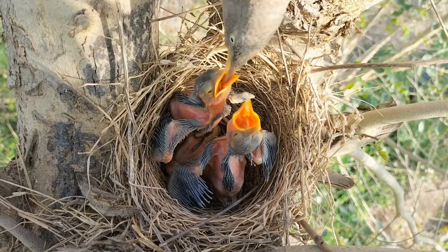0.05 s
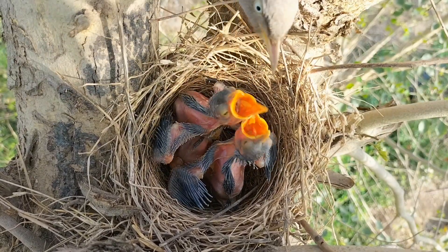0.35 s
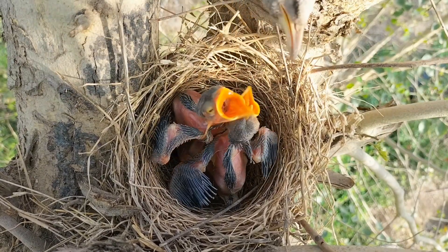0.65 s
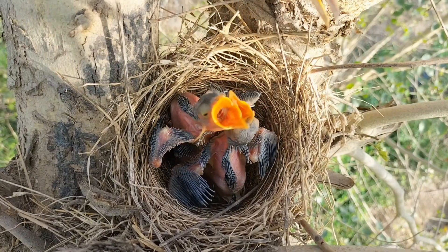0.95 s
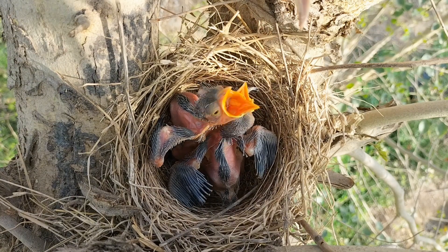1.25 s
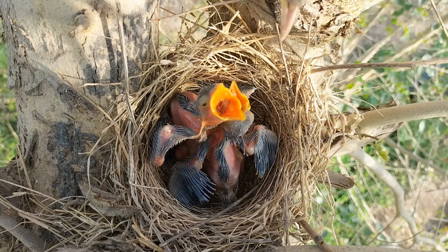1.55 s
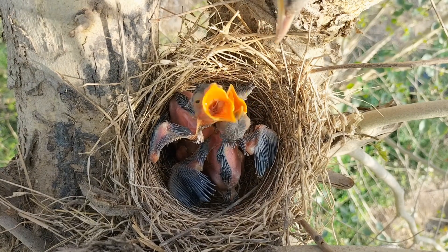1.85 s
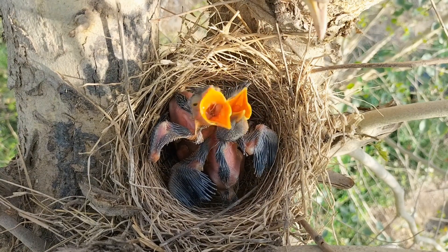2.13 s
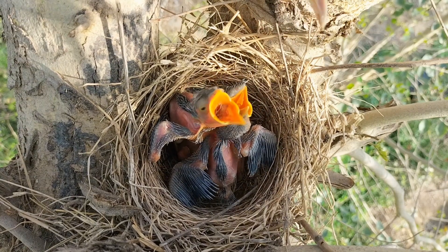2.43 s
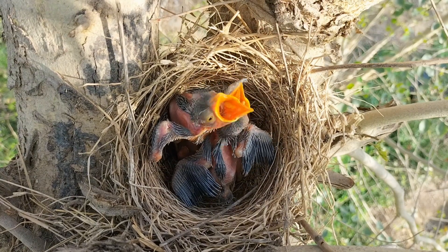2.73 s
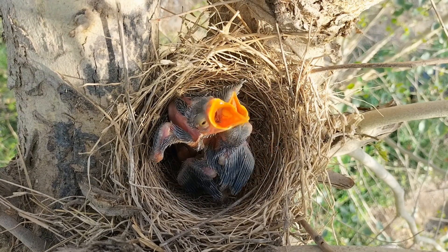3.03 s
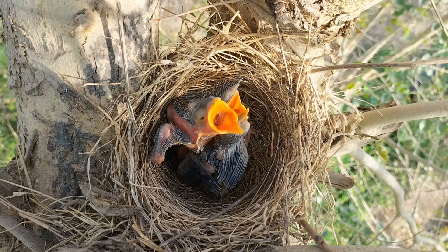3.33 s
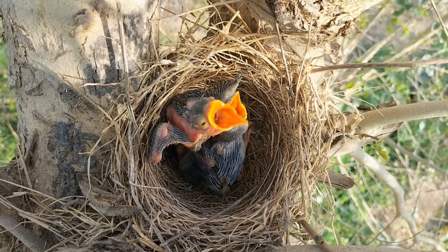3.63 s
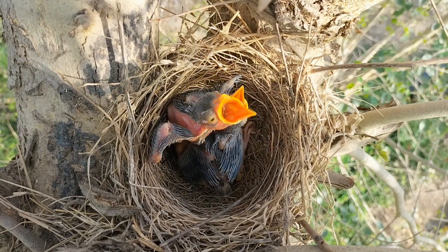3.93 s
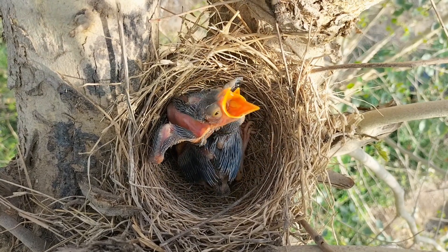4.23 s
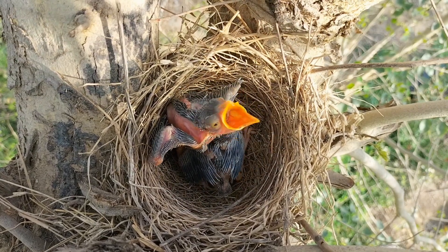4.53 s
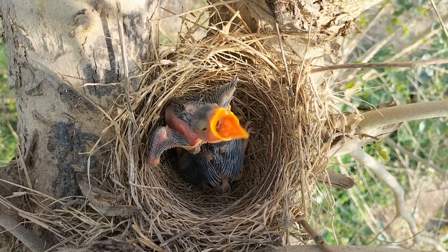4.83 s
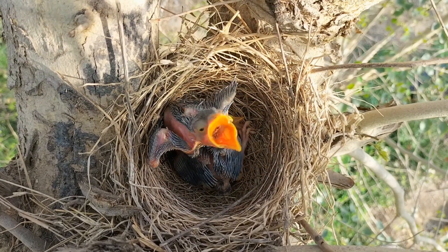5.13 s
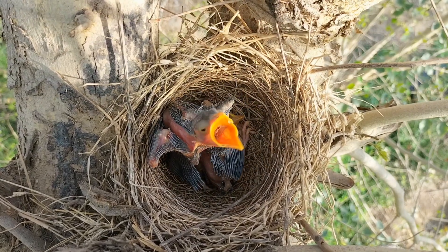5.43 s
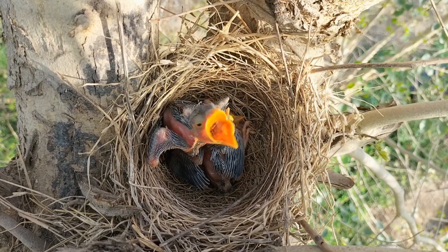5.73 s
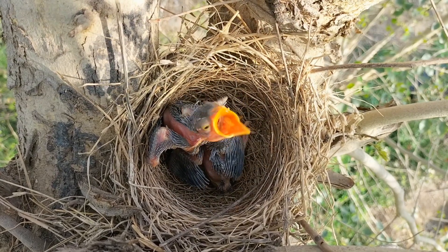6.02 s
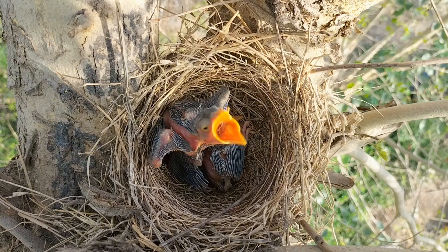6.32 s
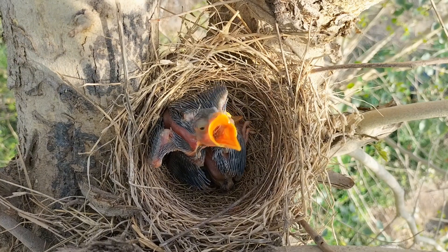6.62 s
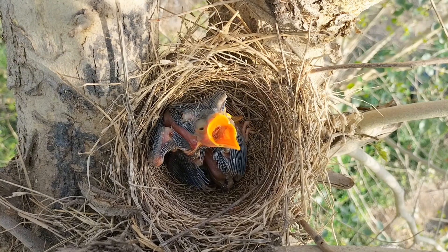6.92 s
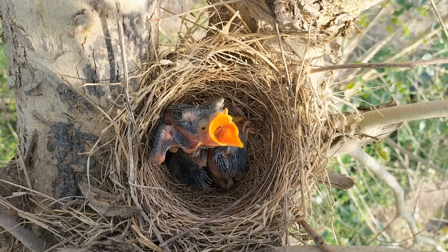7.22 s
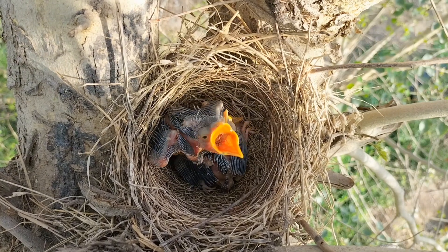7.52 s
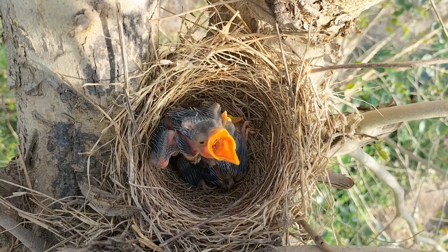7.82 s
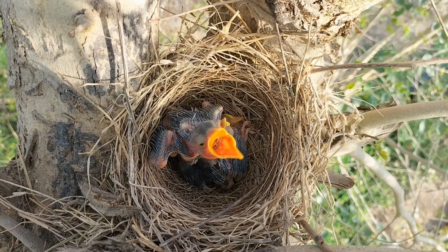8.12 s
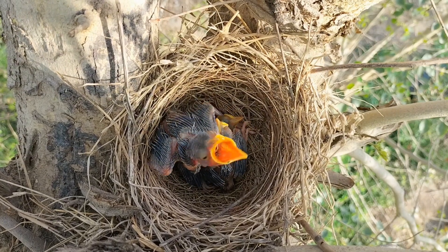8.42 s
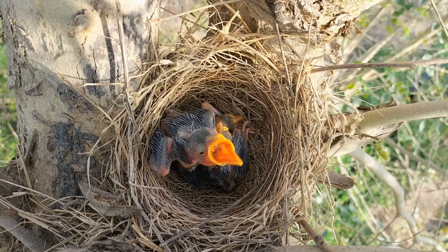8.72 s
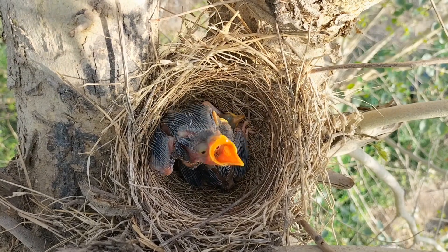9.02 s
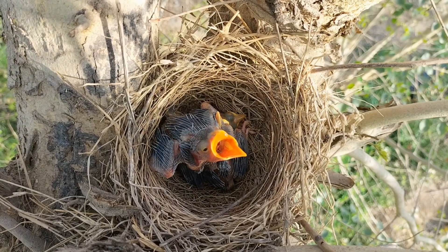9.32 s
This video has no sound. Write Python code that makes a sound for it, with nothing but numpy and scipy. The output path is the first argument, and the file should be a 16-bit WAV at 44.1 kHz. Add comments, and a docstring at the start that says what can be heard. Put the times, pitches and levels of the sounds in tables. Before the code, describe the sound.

An adult bird gives one harsh note, and nestlings start begging close to the microphone. About once a second a shrill call opens as a whistle, breaks into a rasp and fades in a crackle. Between and over these calls, adult birds chatter in quick, rough runs, with a few thin peeps. From about halfway, dry nest straw ticks lightly. A low outdoor rumble and soft hiss lie underneath.

```python
"""Over a low outdoor rumble an adult babbler gives one harsh note, and nestlings begin to beg close by.
Each of their nine calls opens as a whistle of two coupled syrinx voices, breaks into a rasp as they sag,
and ends in a crackle as the air runs out. Between and over the calls come thin peeps and the chatter of
adult birds, one low and barking, one thinner, sometimes overlapping: resonant pulse trains in runs of
about twelve notes a second. From about halfway, dry nest straw ticks. One mono microphone hears it."""
import sys
import numpy as np
from scipy import signal
from scipy.fft import rfft, irfft, next_fast_len
from scipy.io import wavfile
from scipy.ndimage import uniform_filter1d, minimum_filter1d, map_coordinates

SR = 44100
rng = np.random.default_rng(int(sys.argv[2]) if len(sys.argv) > 2 else 0)


def to_wav(sig):
    """Store sig (one row per channel, or 1-D mono) as 16-bit WAV at the path in sys.argv[1].

    Samples outside -1..1 are clipped; the rate is SR.
    """
    pcm = np.clip(np.atleast_2d(sig), -1, 1) * 32767
    pcm = np.round(pcm).astype(np.int16)
    wavfile.write(sys.argv[1], SR, pcm.T)  # frames by channels


N = 412776

# begging calls: start t/s, end t/s, attack t/s, time until the fade t/s, level/dB, fade/dB,
# shrill resonance f/Hz, upper voice opening f/Hz, lower voice opening f/Hz, sag t/s
BEGGING_CALLS = [(.128, 0.599, .17, 0.25, -17.8, 11.5, 6120, 3290, 2198, 0.056),
                 (1.026, 1.711, .13, 0.29, -19, 14, 6140, 2402, 2432, 0.16),
                 (2.436, 2.924, 0.063, 0.25, -16.5, 22.5, 5990, 2550, 2005, .025),
                 (3.805, 4.411, 0.096, .29, -17.5, 11, 6040, 3700, 2520, 0.079),
                 (4.782, 5.311, 0.091, 0.21, -21, 11, 5980, 2416, 2501, 0.12),
                 (5.829, 6.307, 0.12, 0.2, -14.5, 11, 5790, 3370, 2320, .042),
                 (6.728, 7.426, 0.066, .26, -24.5, 3.5, 5920, 2592, 2600, .11),
                 (7.83, 8.371, .18, .22, -15, 17, 5630, 3310, 2299, 0.068),
                 (8.729, 9.362, .085, 0.18, -23, 14, 5870, 2583, 2654, 0.099)]
# a nestling strains: t/s, rise t/s, fall t/s, upper voice lift f/Hz, lower voice lift f/Hz,
# clearing of the rasp (0-1), gain/dB
STRAINS = [(.3, .03, 0.039, 378, 99.5, 0, 4), (.395, .022, 0.088, 620, 1050.5, 0.9, 2),
           (1.128, .042, 0.087, 878.7, 100, 0.32, -0.8), (2.67, 0.023, .04, 80.4, 260, 0.08, -1),
           (3.89, .012, .022, 250.8, 1, 0.65, -2.5), (4.024, .026, .052, 610, 439.5, 0.57, 0.8),
           (4.856, .012, 0.046, 579.4, 0, 0.26, -1.5), (6.115, 0.038, .078, 189.4, 760, .85, 0.9),
           (6.845, .022, .04, 379.6, 0.5, .1, -2), (8.135, .035, 0.044, 439, 500.5, .25, 1.5),
           (8.83, 0.021, 0.039, 640, 1, .45, -0.5)]
# catches of the voice as a call runs out: t/s, boost/dB
CATCHES = [(1.546, 4), (1.623, 6), (2.83, 6), (2.854, 4.5), (2.908, 6), (5.235, 4.5), (9.099, 4.5),
           (9.178, 6), (9.194, 7), (9.271, 8)]
# tone colour of the begging calls as heard, with a deep dip near 9 kHz: f/Hz, level/dB
BEG_COLOUR = [(650, -12.5), (950, -6.5), (1400, -8), (2020, -9.5), (2600, -4.5), (3150, -4.5),
              (3650, -12.5), (4080, -9.5), (4550, -16), (5400, -3.5), (6050, 3), (6700, -5.5),
              (8200, -22.5), (9300, -74.5), (11800, -38), (15000, -54)]
# their throat, mouth and shrill bands: level/dB re the call, swell through the attack/dB
BEG_BANDS = [(-8.5, 19), (-4.5, 11.5), (0, 24)]
# borders between those bands: f/Hz
BEG_SPLITS = [2100, 4600]
# thin peeps: start t/s, length t/s, f/Hz, level/dB of half the peak amplitude
PEEPS = [(.952, .05, 8250, -51), (2.415, .03, 2780, -38), (4.59, .03, 3100, -43), (4.6, .05, 4100, -49),
         (4.66, .05, 4000, -50), (4.703, .035, 8000, -47), (5.37, .05, 3900, -48), (5.565, .035, 3200, -43),
         (5.64, .045, 3380, -43), (5.655, .06, 5900, -39)]
# runs of the adults' notes: first note t/s, last note t/s, base length t/s, pitch f/Hz, first pitch f/Hz,
# first accent/dB, fade per note/dB, roughness (0-1), relative level/dB of chest, throat, mouth, shrill
CHATTER_RUNS = [(.087, .087, 0.048, 703, 701, 0.5, 0, .45, -34.5, -32, -26, -31),
                (.61, .61, 0.037, 494, 495, -1, 0, .8, -38.5, -39.5, -40, -33),
                (.731, .921, 0.036, 368, 523.4, 6, 0, .45, -19, -23, -32.5, -28.5),
                (1.944, 2.371, 0.041, 454.7, 690, 8, 0.25, .72, -41.5, -40, -44.5, -35.5),
                (3.025, 3.025, 0.079, 559, 561.6, 0, 0, .58, -31, -29, -22.5, -27.5),
                (3.13, 3.412, .078, 590, 629, -1, 0.91, 0.686, -35.5, -27.7, -23, -28.5),
                (3.193, 3.279, 0.046, 582, 590, -1.5, 2, .7, -40, -35, -29, -28),
                (3.504, 3.771, 0.039, 630, 540, 3, 0, .75, -40, -40, -35.5, -37),
                (3.537, 3.803, .041, 380, 534, 1, 1.3, .45, -14, -13, -18.3, -21.5),
                (4.575, 4.69, 0.053, 604, 604, 0.5, 0, .9, -60, -44.5, -43.5, -50),
                (5.511, 5.853, 0.039, 394.2, 563, 0.5, 1.5, .52, -20.5, -20.5, -23.5, -22),
                (6.283, 6.541, .04, 535, 672, 3, 2, .5, -34.5, -27, -21, -26.5),
                (6.63, 6.63, .092, 604, 603.4, 0, 0, .6, -32.5, -26, -19, -24),
                (6.767, 6.867, .052, 544, 542, -2.5, 0, .9, -31.5, -31, -23.5, -41),
                (6.982, 7.328, 0.042, 419.8, 500.5, -1.5, 1.5, .7, -20.5, -17.5, -20.5, -23.5),
                (7.425, 7.683, 0.047, 415.6, 430, 4.5, 0, .66, -50.5, -42, -45, -46),
                (7.838, 7.838, 0.054, 759, 745, 0, 0, .54, -49, -32, -23.8, -30),
                (8.2, 8.287, 0.05, 479, 489, 1, 0, .67, -32, -29, -34.5, -46),
                (8.383, 8.657, 0.057, 471, 480, -0.5, 1.6, 0.72, -42.5, -35, -35.5, -40.5)]
# weight of accent and fade in those four bands: factor
BAND_EFFORT = [1, 1.1, 1.27, 0.79]
# borders between those bands: f/Hz
CHATTER_SPLITS = [1400, 2600, 4900]
# tone colour of the chatter as heard, with a deep dip near 9.5 kHz: f/Hz, level/dB
CHATTER_COLOUR = [(600, 7), (1700, -2), (2700, -5), (4000, -2.5), (4900, -8), (6100, -8), (7100, -7),
                  (8100, -15.5), (9500, -61), (12000, -48), (15000, -56.5)]
# resonance peaks colouring the chatter, changing between runs: from t/s, peaks f/Hz
CHATTER_PEAKS = [(0, [750, 1250, 1700, 2450, 3250, 4100, 5250, 6150]),
                 (1.8, [1136, 1480, 2400, 3580, 4130, 4600, 6030, 6380]),
                 (2.9, [1030, 1390, 2090, 2780, 3640, 4170, 5060, 5960]),
                 (3.52, [650, 1000, 1700, 2300, 3100, 4200, 5950, 7100]),
                 (4.3, [700, 1000, 1550, 2000, 2450, 2850, 4000, 5900, 6700]),
                 (6.1, [1083, 1430, 2254, 3685, 4140, 4780, 5960, 6700]),
                 (6.93, [996, 1613, 2010, 2750, 3300, 4150, 5880, 6630])]
# straw ticks: t/s, level/dB before filtering
STRAW_TICKS = [(4.546, -36), (5.644, -21.5), (5.826, -32), (7.804, -26), (7.819, -35), (8.445, -27.5)]
# spectrum of the outdoor air: f/Hz, relative level/dB
AIR_SPECTRUM = [(25, -16), (70, -4), (240, 0), (450, -7), (800, -13), (1600, -14), (3800, -18), (4700, -23),
                (6500, -22), (7800, -38), (9000, -66), (15000, -72)]
# swell of the rumble: t/s, relative level/dB
RUMBLE_SWELL = [(0, -41.5), (.6, -39.5), (1.1, -36), (1.6, -43.5), (2.1, -46.5), (2.6, -38), (3.4, -42),
                (4.6, -40), (5.2, -41.5), (6.3, -35.5), (7, -44), (8.2, -42.5), (9.36, -39)]
# far drone: centre f/Hz, width f/Hz, level/dB
DRONE_BANDS = [(192.2, 15, -47.5), (229.7, 11, -50.5)]


def begging_call(start, end, attack_s, hold_s, level_db, fade_db, shrill_hz,
                 upper_open_hz, lower_open_hz, sag_s, flutter_hz=330, waver=.0059, catch_s=.0069):
    """Nonlinear coupling: the two sides of the syrinx modulate each other and, pushed hard, rasp."""
    t = np.arange(start, end, 1 / SR)
    n, age = len(t), t - start
    upper_hz, lower_hz, rough, strain_db = syrinx(t, upper_open_hz, lower_open_hz, sag_s)
    # an uneven flutter shakes both pitch and loudness
    flutter = np.sin(cycles(flutter_hz * np.exp(.25 * wobble(n, 250))))
    swing = .06 * rough ** .7
    upper = cycles(upper_hz * (1 + swing * (wobble(n, 600) + .7 * flutter) + waver * wobble(n, 110)))
    lower = cycles(lower_hz * (1 + swing * (wobble(n, 400) + .5 * flutter) + waver * wobble(n, 110)))
    # the shared airflow gives overtones and sum and difference tones
    flow = np.exp(.8 * np.sin(upper) + .75 * np.sin(lower))
    points = [(hz * shrill_hz / 6000 if 5000 < hz < 9000 else hz, db) for hz, db in BEG_COLOUR]
    timbre = lambda hz: colour(points, hz)
    tones = even_bands(flow - flow.mean(), timbre, 610, BEG_SPLITS)
    hisses = even_bands(rng.standard_normal(n), timbre, 636, BEG_SPLITS)
    # the overtones dissolve into rasp well before the fundamentals do
    unison = bell(upper_hz - lower_hz, 500)  # two voices on one pitch give a breathy whistle
    low_share = .03 + .37 * rough ** 1.2
    high_share = np.clip(.03 + 1.5 * rough + .7 * unison, 0, .75)
    bands = map(breathy, tones, hisses, [low_share, low_share, high_share])
    # the call swells, holds and fades ever faster; the mouth band speaks first
    opening = np.clip(1 - age / attack_s, 0, 1) ** 2
    fading = np.clip((age - hold_s) / (end - start - hold_s), 0, 1) ** 1.31
    call_db = level_db + strain_db - fade_db * fading
    voice = sum(amp(call_db + db - swell_db * opening) * band
                for (db, swell_db), band in zip(BEG_BANDS, bands))
    # as the air runs out, the rasp loosens into a slow crackle and the voice stutters
    crackle_db = 1.5 * np.linspace(.5, 1.5, n) * wobble(n, 210)
    pulsing = steady(amp(rough * (2.5 * flutter + crackle_db)), span_s=.039)
    stutter_db = 1.84 * fading * wobble(n, 79.95)
    catch_db = sum(db * bell(t - at, catch_s) for at, db in CATCHES)
    edges = np.clip(np.minimum(age / .006, (end - t) / .018), 0, 1)
    return voice * pulsing * amp(stutter_db + catch_db) * edges


def syrinx(t, upper_open_hz, lower_open_hz, sag_s,
           upper_rest_hz=2602, lower_rest_hz=1312, sink_hz_per_s=680, whistle_s=.0748):
    """Tension sets pitch: both voices open taut and clean, sag into a rasp and lift under strain."""
    age = t - t[0]
    taut = bell(age, sag_s)
    upper_hz = upper_rest_hz + (upper_open_hz - upper_rest_hz) * taut
    lower_hz = (lower_rest_hz - sink_hz_per_s * age) * (1 - taut) + lower_open_hz * taut
    clean = bell(age, (whistle_s + sag_s) / 2)
    rough = np.linspace(.72, .97, len(t)) * (1 - clean)
    strain_db = 0
    for at, rise_s, fall_s, upper_lift, lower_lift, clearing, gain_db in STRAINS:
        strain = bell(t - at, np.where(t < at, rise_s, fall_s))
        upper_hz += upper_lift * strain
        lower_hz += lower_lift * strain
        rough *= 1 - clearing * np.minimum(1, strain / .74)
        strain_db += gain_db * strain
    # a slack voice wanders in pitch, the lower one most
    drift = lambda depth: np.exp(depth * rough ** 2 * wobble(len(t), 130))
    return upper_hz * drift(.045), lower_hz * drift(.07), np.clip(rough, 0, 1), strain_db


def nestlings():
    """Superposition: the begging calls add to thin peeps, each a wavering pure tone."""
    track = np.zeros(N)
    for call in BEGGING_CALLS:
        add(track, call[0], begging_call(*call))
    for start, length_s, hz, db in PEEPS:
        n = int(length_s * SR)
        tone = np.sin(cycles(hz * (1 + .01 * wobble(n, 200))))
        add(track, start, 2 * amp(db) * np.hanning(n) * tone)
    return track


def chatter_note(length_s, pitch_hz, rough, levels_db, peaks_hz, fall, jitter=.1304, closure=22):
    """Source and filter: uneven syrinx pulses of falling pitch and puffs of air excite resonances."""
    n = int(length_s * SR)
    progress = np.linspace(0, 1, n)
    phase = cycles(pitch_hz * np.exp(-fall * progress ** 1.3 + jitter * rough * wobble(n, 608)))
    pulses = np.exp(closure * (np.cos(phase) - 1)) * amp(4 * rough * wobble(n, 500))
    puffs = rng.standard_normal(n) * amp(1.4 * np.cos(phase))
    # each resonance rings on after a pulse
    ringing = lambda hz: sum(1 / (1 + 1j * (hz - peak) / (150 + .025 * peak)) ** 2 for peak in peaks_hz)
    timbre = lambda hz: colour(CHATTER_COLOUR, hz) * (.15 + ringing(hz))
    low_hz = 1.3 * pitch_hz  # the fundamental hardly radiates
    tones = even_bands(np.gradient(pulses), timbre, low_hz, CHATTER_SPLITS)
    hisses = even_bands(puffs, timbre, low_hz, CHATTER_SPLITS)
    # the resonances sink through a note, most in the high-pitched notes
    sink = fall * np.clip((pitch_hz - 300) / 700, .1, .38)
    warp = (n - 1) * (progress + sink * progress * (1 - progress))
    arch = np.clip(np.sin(np.pi * progress), 0, 1)
    note = np.zeros(n)
    for k, (db, tone, hiss) in enumerate(zip(levels_db, tones, hisses)):
        # higher bands are breathier and gather nearer the height of the note
        band = breathy(tone, hiss, np.clip(.64 * rough * (.66 + .31 * k), 0, 1))
        if k < len(CHATTER_SPLITS):  # the shrill top band stays put
            band = map_coordinates(band, [warp], mode="nearest")
        note += amp(db - 1.7) * unit(arch ** (.79 + .082 * k)) * band
    # the hardest notes get a bright, spitting edge
    spit = noise(n, lambda hz: above(hz, 5200) * (1 - above(hz, 20000, order=8)))
    return note + amp(-32) * note ** 2 * np.abs(note).max() ** 2 * spit


def adults(period_s=.088, skirt_s=.003, first_fall=.33, later_fall=.2):
    """Periodic repetition: harsh notes keep an even beat, and the first of a run glides furthest down."""
    track = np.zeros(N)
    for first, last, length_s, run_hz, first_hz, accent_db, fade_db, rough, *bands_db in CHATTER_RUNS:
        run_peaks_hz = [peaks for since, peaks in CHATTER_PEAKS if since <= first][-1]
        count = 1 + round((last - first) / period_s)
        for k, start in enumerate(np.linspace(first, last, count)):
            pitch_hz, gain_db = (run_hz, -fade_db * k) if k else (first_hz, accent_db)
            fall = later_fall if k else first_fall
            note_s = length_s * (pitch_hz / run_hz) ** .602 + 2 * skirt_s
            peaks_hz = np.array(run_peaks_hz) + rng.normal(0, 70, len(run_peaks_hz))
            levels_db = np.array(bands_db) + gain_db * np.array(BAND_EFFORT)
            add(track, start - skirt_s, chatter_note(note_s, pitch_hz, rough, levels_db, peaks_hz, fall))
    return track


def straw(t60_s=.029):
    """Damped transients: dry stems snap under the birds' weight, each a decaying burst of noise."""
    track, t = np.zeros(N), np.arange(SR // 20) / SR
    for start, db in STRAW_TICKS:
        add(track, start, amp(db - 60 * t / t60_s) * rng.standard_normal(len(t)))
    spectrum = [(300, -21), (1500, 5.5), (6500, -1.5), (9500, -26), (15000, -22)]
    return filtered(track, lambda hz: colour(spectrum, hz))


def foliage(x, t60_s=.38, wet_db=-23):
    """Scattering: trunk and leaves return a faint, short echo."""
    t = np.arange(SR // 3) / SR
    tail = rng.standard_normal(len(t)) * amp(-60 * t / t60_s) * (1 - np.exp(-t / .0013))
    return amp(wet_db) * signal.fftconvolve(x, tail / np.linalg.norm(tail))[:N]


def outdoors(air_db=-41):
    """Incoherent addition: noise bands give soft leaf hiss, a swelling distant rumble and a low drone."""
    air = noise(N, lambda hz: colour(AIR_SPECTRUM, hz) * above(hz, 39, order=4))
    spectrum = [(25, -34.5), (70, -19.5), (140, -10.5), (250, 4.5), (340, -2), (480, -7.5), (1200, -53)]
    rumble = noise(N, lambda hz: colour(spectrum, hz))
    drone = sum(amp(db) * noise(N, lambda hz: 1 / (1 + (2 * (hz - centre) / width) ** 2))
                for centre, width, db in DRONE_BANDS)
    rumble_db = np.interp(np.arange(N) / SR, *np.transpose(RUMBLE_SWELL)) - 2.5
    return air * amp(air_db + 1.1 * wobble(N, 3)) + rumble * amp(rumble_db) + drone


def even_bands(source, response, low_hz, splits):
    """Filter bank: the source is coloured by a response and split into evenly loud bands."""
    edges = [low_hz, *splits, SR]
    return [steady(filtered(source, lambda hz: response(hz) * above(hz, lo) * (1 - above(hz, hi))))
            for lo, hi in zip(edges, edges[1:])]


def breathy(tone, hiss, share):
    """Uncorrelated powers add: hiss takes the given share of the total."""
    return np.sqrt(1 - share) * tone + np.sqrt(share) * hiss


def amp(db):
    """Decibel law: level to amplitude ratio."""
    return 10 ** (np.asarray(db) / 20)


def unit(x):
    """Normalisation to rms 1."""
    return x / np.sqrt(np.mean(x ** 2) + 1e-20)


def steady(x, span_s=.01):
    """Gain control holds the running rms at 1."""
    return x / np.sqrt(np.abs(uniform_filter1d(x ** 2, int(span_s * SR))) + 1e-12)


def wobble(n, rate):
    """Spline interpolation: a smooth random curve of n samples, rate knots a second."""
    return map_coordinates(rng.standard_normal(int(n * rate / SR) + 4), [np.arange(n) * rate / SR])


def bell(x, width):
    """Gaussian hump of height 1 around zero."""
    return np.exp(-(x / width) ** 2)


def cycles(hz):
    """Phase in radians is the integral of angular frequency."""
    return 2 * np.pi * np.cumsum(hz) / SR


def filtered(x, response):
    """Linear filtering multiplies the spectrum by a frequency response."""
    m = next_fast_len(len(x) + 4096)
    return irfft(rfft(x, m) * response(np.fft.rfftfreq(m, 1 / SR)), m)[:len(x)]


def noise(n, response):
    """Spectral shaping of white noise, at rms 1."""
    return unit(filtered(rng.standard_normal(n), response))


def colour(points, hz):
    """Gain by interpolation of (f/Hz, level/dB) points on a log axis."""
    f, db = np.transpose(points)
    return amp(np.interp(np.log(hz + 1), np.log(f), db))


def above(hz, edge_hz, order=16):
    """High-pass response with a power-law slope."""
    return 1 - 1 / (1 + (hz / edge_hz) ** order)


def add(track, start, sound):
    """Superposition of a sound on the track at a start time."""
    part = track[max(round(start * SR), 0):][:len(sound)]
    part += sound[:len(part)]


def scene():
    """Pressures add at one microphone, alike in both channels."""
    near = nestlings() + adults() + straw()
    return np.tile(near + foliage(near) + outdoors(), (2, 1))


def record(dry, ceiling=1.0, top_hz=15700):
    """Peak and band limiting: a fast gain dip holds the loudest peaks, then a low-pass cuts the top."""
    needed = np.minimum(1, ceiling / (np.abs(dry[0]) + 1e-9))
    gain = uniform_filter1d(minimum_filter1d(needed, size=90), size=90)
    return np.array([filtered(channel * gain, lambda hz: hz < top_hz) for channel in dry])


dry = scene()
out = record(dry)
to_wav(out)
```